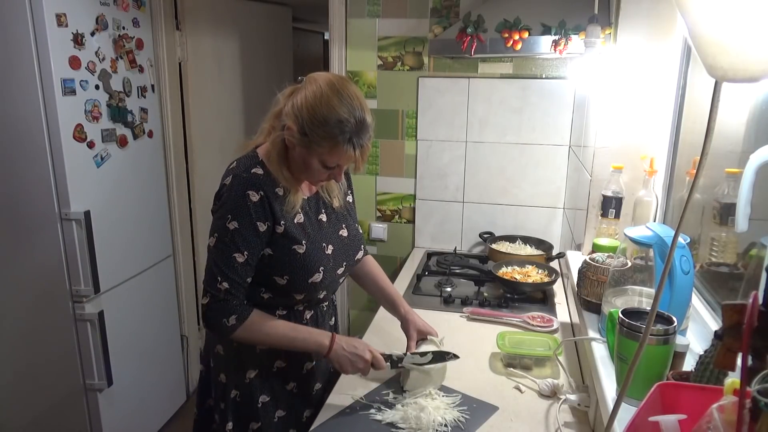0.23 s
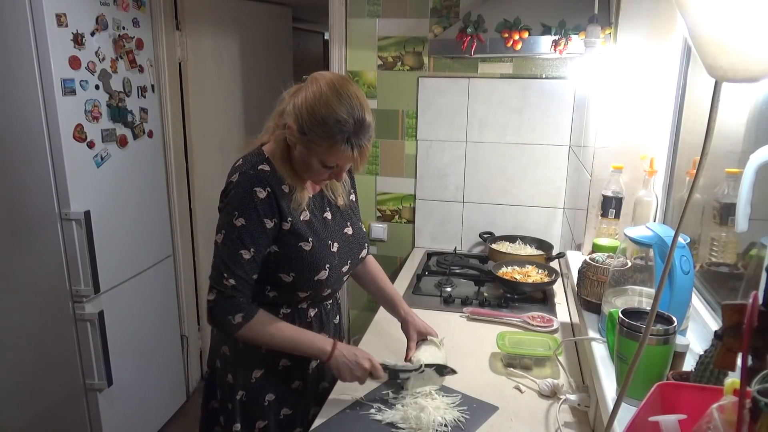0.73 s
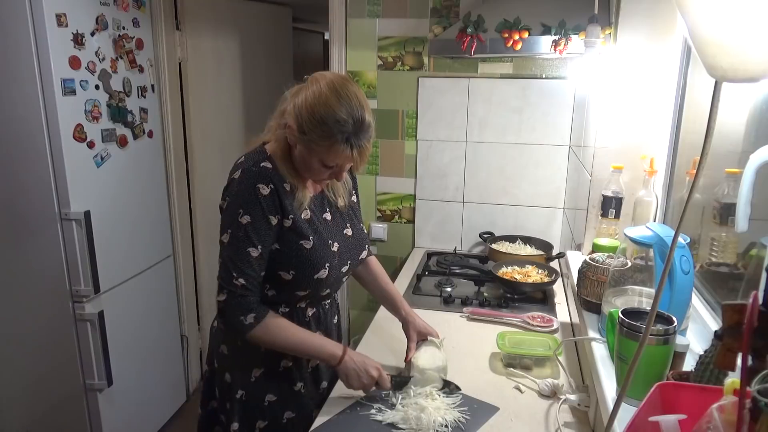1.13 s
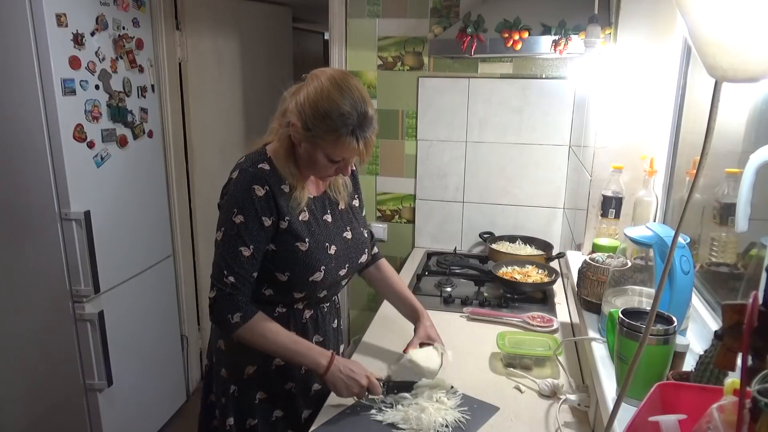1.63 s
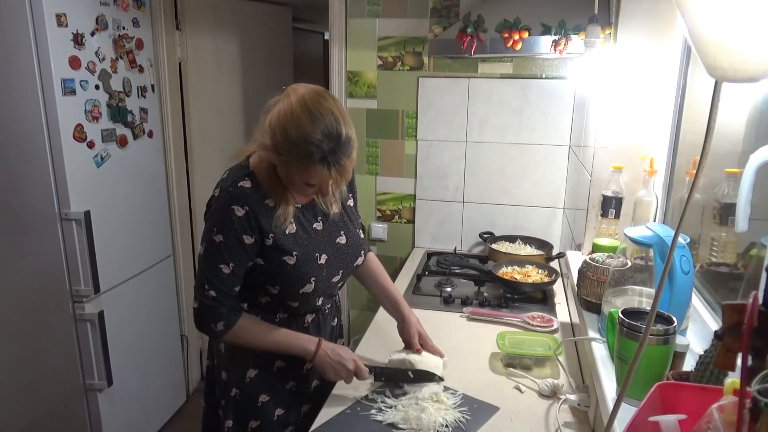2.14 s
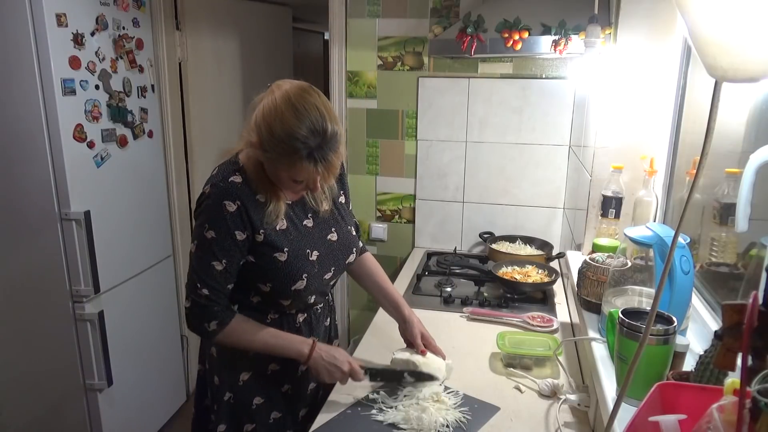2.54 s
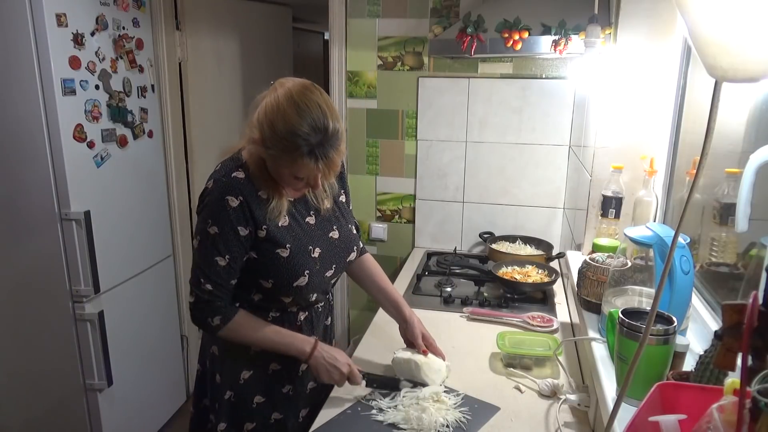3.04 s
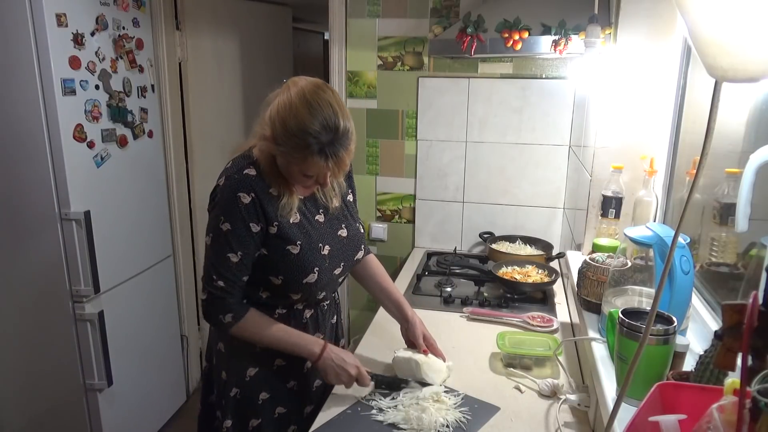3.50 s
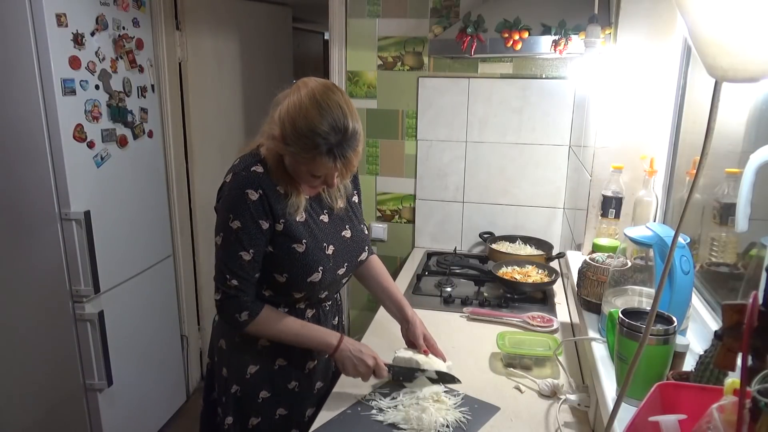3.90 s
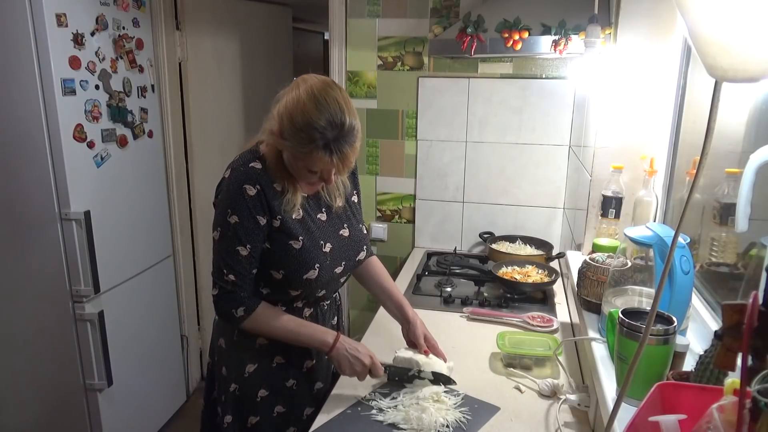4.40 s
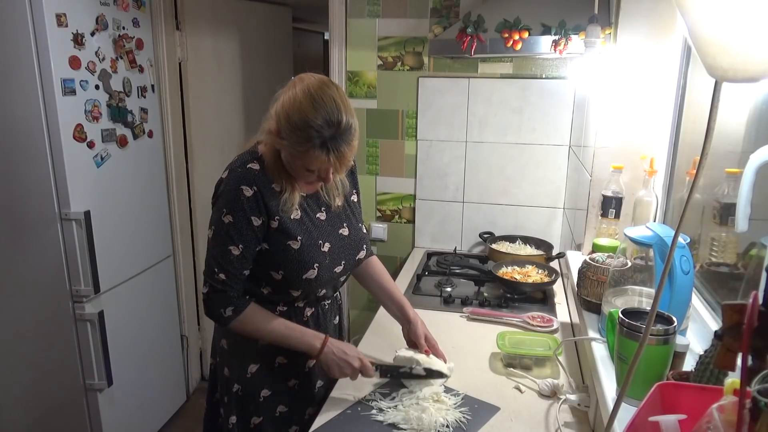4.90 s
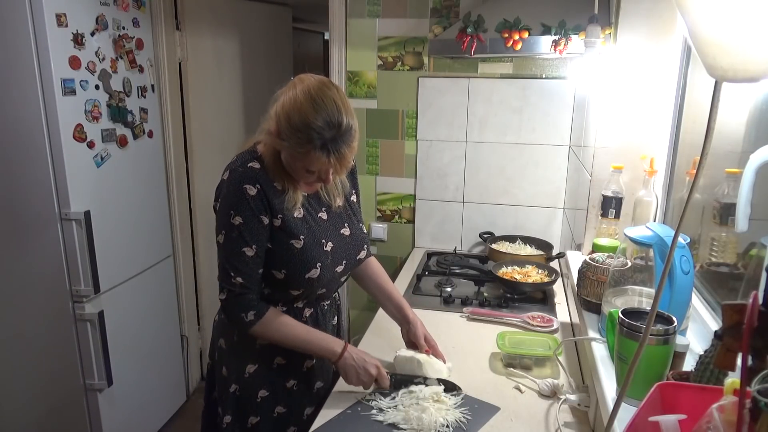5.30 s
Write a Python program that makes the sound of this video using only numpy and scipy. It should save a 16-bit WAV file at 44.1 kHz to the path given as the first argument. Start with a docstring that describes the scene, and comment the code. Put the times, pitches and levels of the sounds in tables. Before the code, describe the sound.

Crisp, uneven slicing and chopping of cabbage, with occasional knocks of blade on board, over a steady faint sizzle of frying.

```python
"""In a small kitchen, a large knife shreds a cabbage on a cutting board while two pans sizzle behind.
Steam bubbles burst in hot oil over the rush of gas burners. The edge fractures crisp cells in streams
and leaf ribs in single snaps; friction makes the board hum, light contacts tap it, and once the core
cracks. Full strokes end in an impact that excites the modes of board, counter and metalware.
The room reverberates, and a limiter holds the knocks down."""
import sys
import numpy as np
from scipy import signal
from scipy.io import wavfile
from scipy.ndimage import uniform_filter1d, minimum_filter1d

SR = 44100
rng = np.random.default_rng(int(sys.argv[2]) if len(sys.argv) > 2 else 0)


def to_wav(s):
    """Save 16-bit WAV."""
    ch = np.atleast_2d(s).T  # columns
    pcm = np.round(np.clip(ch, -1, 1) * 32767)  # PCM
    wavfile.write(sys.argv[1], SR, pcm.astype(np.int16))


N = 244754

# Fracture spectra of thin leaves and packed core. Each row: frequency in Hz, relative density in dB.
LEAF_SPECTRUM = [(35, -45), (95, -26), (130, -15.5), (160, -7), (230, -38), (2000, -15), (4000, -10),
                 (5400, -2), (6800, 0), (7800, 0), (9200, 6), (11000, -1), (13000, -7), (15500, -13.5)]
CORE_SPECTRUM = [(30, -28), (90, -17.5), (160, -13.5), (240, -20.5), (350, 0.5), (650, 2), (1200, 5),
                 (1900, 6.5), (3000, 5.5), (4600, 3.5), (6500, 0), (12000, -33.5)]


def amp(db):
    """Amplitude ratio: a factor of ten for every 20 dB."""
    return 10 ** (np.asarray(db) / 20)


def unit_rms(x):
    """Normalisation to a mean power of 1."""
    return x / np.sqrt(np.mean(x ** 2) + 1e-20)


def value_at(curve, hz):
    """Interpolation along a logarithmic frequency axis."""
    curve_hz, values = np.transpose(curve)
    return np.interp(np.log(hz + 1), np.log(curve_hz + 1), values)


def add(mix, start_s, sound):
    """Superposition: a stereo sound joins the mix at its start time."""
    part = mix[:, round(start_s * SR):][:, :sound.shape[1]]
    part += sound[:, :part.shape[1]]


def convolve(x, response):
    """Convolution with an impulse response, cut to the length of x."""
    return signal.fftconvolve(np.atleast_2d(x), np.atleast_2d(response), axes=1)[:, :x.shape[-1]]


def colour(x, spectrum, size=4096):
    """Minimum-phase filtering imposes a spectrum while clicks keep their sharp onset."""
    log_gain = np.log(amp(value_at(spectrum, abs(np.fft.fftfreq(size, 1 / SR)))))
    transfer = np.exp(np.conj(signal.hilbert(log_gain)))
    return convolve(x, np.fft.ifft(transfer).real)


def diffuse(pair):
    """Partial coherence: two independent signals, as mid and side, form a diffuse stereo field."""
    # Stereo width. Each row: frequency in Hz, side relative to mid in dB.
    width = [(100, -21), (330, -20), (650, -9), (1400, -8.5), (4000, -7), (8000, -8.5), (10500, -11.5),
             (13000, -41)]
    side = colour(pair[1], width)[0]
    return np.array([pair[0] + side, pair[0] - side])


def kitchen(wet_db, onset_s=.002):
    """Reverberation: direct sound, then dense, exponentially decaying reflections off counter and tiles."""
    # Reverberation time. Each row: frequency in Hz, time to fall 60 dB in seconds.
    room_t60 = [(100, 0.41), (400, 0.38), (1200, 0.34), (3000, 0.31), (8000, 0.24), (15000, 0.18)]
    size = SR // 2
    hz, t, noise_bands = signal.stft(rng.choice([-1., 1.], (2, size)), SR, nperseg=256)
    decay = amp(-60 * t / value_at(room_t60, hz)[:, None])
    tail = signal.istft(noise_bands * decay, SR)[1][:, :size]
    tail = diffuse(tail) * np.clip(np.arange(size) / SR / onset_s, 0, 1)
    response = amp(wet_db) * tail / np.linalg.norm(tail[0])
    response[:, 0] += 1  # the direct sound
    return response / np.linalg.norm(response[0])


def room_click(spectrum, wet_db):
    """Impulse response of a coloured source across the kitchen, with unit energy on the left."""
    response = colour(kitchen(wet_db), spectrum)
    return response / np.linalg.norm(response[0])


def clicks(per_s, spread_db):
    """A Poisson train of impulses of either sign: many small, a few large."""
    sizes = amp(spread_db * np.minimum(rng.exponential(1, N), 4))
    return unit_rms(sizes * rng.choice([-1, 1], N) * (rng.random(N) < per_s / SR))


def bursts(force, spectrum, wet_db, per_s, spread_db, spots=3):
    """Shot noise: tiny bursts scale with a force, at a few spots with separate paths through the room."""
    arrivals = [convolve(force * clicks(per_s / spots, spread_db), room_click(spectrum, wet_db))
                for _ in range(spots)]
    return sum(arrivals) / np.sqrt(spots)


def flicker(depth_db, per_s):
    """Random amplitude modulation: the level glides between normally distributed values."""
    t = np.arange(N) / SR
    return amp(depth_db * np.interp(t * per_s, np.arange(N), rng.standard_normal(N)))


def pans(sizzle_db=-39.5, burners_db=-58.5):
    """Steam bubbles bursting in hot oil make shot noise over the broadband rush of the gas burners."""
    # Spectra of bubbles and flames. Each row: frequency in Hz, relative density in dB.
    sizzle_spectrum = [(300, -55), (700, -32), (1000, -21), (1300, -13), (1850, -7), (2500, -7),
                       (3200, -6.5), (4000, -5.5), (5500, -4), (6600, -3.5), (7700, -0.5), (8700, 0),
                       (10500, -5.5), (13000, -12), (15800, -22.5)]
    burner_spectrum = [(20, -38), (50, -33), (90, -18.5), (160, -18), (250, -24.5), (360, -2), (480, -11.5),
                       (620, -5), (850, -2.5), (1100, -3.5), (1600, -24.5), (4000, -52)]
    boil = flicker(depth_db=-0.73, per_s=7)
    bubbles = bursts(boil, sizzle_spectrum, wet_db=4, per_s=5000, spread_db=4.5)
    flames = colour(diffuse(rng.standard_normal((2, N))), burner_spectrum)
    return amp(sizzle_db) * unit_rms(bubbles) + amp(burners_db) * unit_rms(flames)


def edge_force(swing_db=23.5, rounding=1.22, core_lag_s=0.0041, core_steepness=1.436):
    """Amplitude envelopes of fracture: how hard the edge works on the leaves and on the core."""
    # The blade is drawn through cabbage or loose shreds without a knock. Each row: deepest moment,
    # push time and release time in seconds, leaf level and core level in dB.
    slices = [ (0.42, 0.086, 0.11, -31.5, -42.5), (0.672, 0.098, .06, -30, -44),
              (0.918, 0.072, 0.087, -25.5, -33.5), (1.348, .02, 0.12, -36.5, -36.5),
              (3.994, 0.21, 0.06, -27, -31), (4.614, .1, 0.053, -23.5, -27.5),
              (5.16, 0.11, 0.08, -29, -29.5), ]
    # The blade speeds up and breaks out just above the board. Each row: moment of breaking through
    # and push time in seconds, leaf level and core level in dB.
    chops = [ (1.197, 0.078, -16, -16), (2.318, 0.14, -25, -23), (2.886, 0.14, -20.5, -18),
             (3.405, 0.13, -22, -18), (4.802, 0.074, -28.5, -28.5), (5.286, 0.072, -21, -15.5), ]
    t = np.arange(N) / SR
    on_leaves, on_core = np.zeros((2, N))
    for deepest, push, release, leaf_db, core_db in slices:
        for force, db, lag_s in (on_leaves, leaf_db, 0), (on_core, core_db, core_lag_s):
            since_deepest = t - lag_s - deepest
            away = np.maximum(-since_deepest / push, since_deepest / release)
            force += amp(db - swing_db * abs(away) ** rounding)  # rounding 1 is pointed, 2 a bell
    for through, push, leaf_db, core_db in chops:
        growth_db = np.where(t < through, swing_db * (t - through) / push, -np.inf)
        on_leaves += amp(leaf_db + growth_db)
        on_core += amp(core_db + core_steepness * growth_db)
    return on_leaves, on_core


def blade(x):
    """Resonance of the thin steel blade colours whatever excites it."""
    # Blade modes. Each row: frequency in Hz, bandwidth in Hz, gain in dB.
    blade_modes = [(5420, 160, -1), (7860, 860, -2.5), (8700, 260, -21), (11260, 550, -8.5)]
    return x + sum(amp(db) * signal.lfilter(*signal.iirpeak(hz, hz / width_hz, SR), x)
                   for hz, width_hz, db in blade_modes)


def cutting(crackle_db=-1, crunch_db=2.0):
    """Brittle fracture: the edge bursts cells, in clumps as it passes from leaf to leaf."""
    on_leaves, on_core = edge_force()
    clumps = unit_rms(flicker(depth_db=2.0, per_s=200))
    crackle = bursts(on_leaves * clumps, LEAF_SPECTRUM, wet_db=0, per_s=3000, spread_db=2.5, spots=2)
    crunch = bursts(on_core * clumps, CORE_SPECTRUM, wet_db=3.0, per_s=3000, spread_db=3.0, spots=2)
    return blade(amp(crackle_db) * crackle + amp(crunch_db) * crunch)


def drags(hum_hz=645, width_hz=100, taper=0.61):
    """Friction under the moving blade drives the board's strongest resonance into a soft hum."""
    # Drags over the board. Each row: start in seconds, length in seconds, level in dB.
    strokes = [(0.386, 0.083, -52.5), (1.33, .18, -47.5), (2.025, .11, -57.5), (2.181, 0.058, -54.5),
               (2.457, .095, -45.5), (2.773, .09, -45), (3.001, 0.095, -44.5), (4.361, 0.051, -58)]
    out = np.zeros((2, N))
    resonance = signal.butter(2, [hum_hz - width_hz / 2, hum_hz + width_hz / 2], "band", fs=SR)
    for start_s, length_s, db in strokes:
        size = round(length_s * SR)
        friction = diffuse(rng.standard_normal((2, 2 * size)))
        hum = signal.lfilter(*resonance, friction)[:, size:]  # steady state only
        add(out, start_s, amp(db) * unit_rms(hum * signal.windows.tukey(size, taper)))
    return out


def taps_and_core_crack(band_ratio=1.265):
    """Each impulse excites one heavily damped resonance, heard mostly as reverberation."""
    # Light taps on the board, and one louder mid-pitched crack at 5.256 s as the blade breaks into
    # the core. Each row: start in seconds, level in dB, pitch in Hz.
    impulses = [(0.528, -40, 1510), (0.872, -30.5, 1930), (1.076, -38, 1720), (1.733, -39, 1800),
                (1.978, -31.5, 1720), (1.986, -43, 1680), (2.19, -34.5, 1600), (2.763, -35.5, 1010),
                (3.331, -25, 1300), (5.082, -36, 1980), (5.256, -15.5, 1900)]
    out = np.zeros((2, N))
    for start_s, db, hz in impulses:
        resonance = signal.butter(2, [hz / band_ratio, hz * band_ratio], "band", fs=SR)
        sound = signal.lfilter(*resonance, kitchen(wet_db=14))
        add(out, start_s, amp(db) * sound / abs(sound).max())
    return out


def snaps(crunch_db=-8, cutoff_hz=14000, tear_db=-12, tear_s=0.00057):
    """Sudden fracture: a leaf rib breaks with one impulse and a very short, noisy tear."""
    # Breaking ribs. Each row: start in seconds, level in dB.
    ribs = [(0.592, -23), (0.643, -38), (0.905, -13), (0.927, -22), (1.1329, -9.5), (1.266, -13),
            (1.363, -33), (2.124, -23), (2.656, -25), (2.811, -9), (2.8665, -27), (3.196, -25),
            (3.377, -25), (3.69, -25), (4.5201, -14), (4.563, -20), (4.597, -23), (4.6, -19),
            (4.6928, -16.5), (4.782, -18.5), (4.798, -26), (4.842, -7.5), (5.2565, -14), (5.347, -16)]
    out = np.zeros((2, N))
    t = np.arange(SR // 100) / SR
    low_pass = signal.butter(2, cutoff_hz, fs=SR)
    for start_s, db in ribs:
        crack = (t == 0) + amp(tear_db) * rng.standard_normal(len(t)) * np.exp(-t / tear_s)
        response = room_click(LEAF_SPECTRUM, wet_db=2.0)
        response += amp(crunch_db) * room_click(CORE_SPECTRUM, wet_db=15.0)
        snap = blade(signal.lfilter(*low_pass, convolve(response, crack)))
        add(out, start_s, amp(db) * snap / abs(snap).max())
    return out


def board_response(metal_db, board_t60_s=0.22, wash_db=-5, direct_db=-12, spot_db=2.4, rise_s=0.0013):
    """Modal superposition: board, counter, room and metalware ring as a sum of damped sinusoids."""
    # Modes of board, counter and room. Each row: frequency in Hz, relative level in dB.
    board_modes = [(329, -20), (376, -16), (432, -12), (456, -11), (496, -13), (543, -14), (602, -9),
                   (637, -4), (655, 0), (681, -4), (746, -9), (833, -8), (858, -9), (926, -7), (969, -13),
                   (1011, -5), (1033, -6), (1060, -2), (1089, -14), (1302, -6), (1331, -6), (1377, -4),
                   (1422, -4), (1461, -8), (1506, -12), (1567, -2), (1699, -11), (1781, -6), (2081, -11),
                   (2196, -11)]
    # Metalware on the counter. Each row: frequency in Hz, relative level in dB, 60 dB decay in seconds.
    metal_modes = [(566, -20.5, 0.97), (884, -28, 0.95), (1112, -29.5, 0.54)]
    # Dense, weaker resonances between the modes. Each row: frequency in Hz, relative density in dB.
    wash_spectrum = [(30, -34), (100, -31.5), (160, -15), (260, -22), (360, -3.5), (650, 0.5), (1050, 6),
                     (1200, 1), (1450, 7), (1850, 2), (2300, -6.5), (3000, -9), (5000, -27), (10000, -37)]
    t = np.arange(SR // 2) / SR
    modes = [(hz, db, board_t60_s) for hz, db in board_modes]
    modes += [(hz, db + metal_db, t60) for hz, db, t60 in metal_modes]
    ring = np.zeros((2, len(t)))
    for k, (hz, db, t60) in enumerate(modes):
        # Short waves reach left and right out of step.
        lead_radians = 0.4 * min(hz / 600, 1) ** 2 * rng.choice([-1, 1])
        phase = np.pi * k + np.array([[lead_radians], [-lead_radians]])  # neighbours swing oppositely
        weight = amp(db + spot_db * rng.standard_normal())  # varies with the spot struck
        ring += weight * np.exp(-np.log(1000) * t / t60) * np.sin(2 * np.pi * hz * t + phase)
    ring *= (1 - np.exp(-t / rise_s)) ** 2
    direct = colour(1. * (t == 0), wash_spectrum)
    response = ring / np.linalg.norm(ring[0]) + amp(wash_db) * room_click(wash_spectrum, wet_db=12)
    response += amp(direct_db) * direct / np.linalg.norm(direct)
    return response / np.sqrt(np.sum(response ** 2) / (2 * 0.02 * SR))  # energy of 20 ms at rms 1


def knocks(contact_q=0.95):
    """Elastic impact of blade on board: cabbage cushions and dulls it; a resting blade damps the ring."""
    # Each row: start in seconds, level in dB, contact cut-off (hardness) in Hz,
    # added damping in dB per second, metalware gain in dB.
    blows = [ (1.2005, -7.5, 1460, 6, -2.5), (2.3228, -4.5, 1850, 10, -1.5), (2.8908, -8.5, 1100, 9, -9),
             (3.409, -5, 1980, 24, -4.5), (3.784, -43.5, 1210, 48, 4), (4.727, -36.5, 1200, 122, -3),
             (4.8036, -20.5, 1060, 98, 6), (5.2889, -3.5, 2520, 20, -8), ]
    out = np.zeros((2, N))
    for start_s, db, contact_hz, damping_db_per_s, metal_db in blows:
        # The contact is a spring: it passes what lies below its own frequency, with a slight peak.
        omega = 2 * np.pi * contact_hz
        contact = signal.bilinear([omega ** 2], [1, omega / contact_q, omega ** 2], SR)
        knock = signal.lfilter(*contact, board_response(metal_db))
        t = np.arange(knock.shape[1]) / SR
        add(out, start_s, amp(db - damping_db_per_s * t) * knock)
    return out


def scene(left_minus_right_db=-0.5):
    """Superposition of knife and pans, with a slight level difference between the channels."""
    knife = cutting() + snaps() + knocks() + drags() + taps_and_core_crack()
    balance = amp([[left_minus_right_db / 2], [-left_minus_right_db / 2]])
    return (knife + pans()) * balance


def record(dry, ceiling_db=-5.0, release_db_per_s=330, ahead_samples=110, cutoff_hz=15850):
    """Look-ahead limiting: the gain dips just before loud peaks and recovers fast; a low-pass follows."""
    over_db = np.maximum(20 * np.log10(abs(dry).max(0) + 1e-9) - ceiling_db, 0)
    ahead_db = -minimum_filter1d(-over_db, 2 * ahead_samples)
    release_db = np.arange(N) * release_db_per_s / SR
    held_db = np.maximum.accumulate(ahead_db + release_db) - release_db
    duck_db = uniform_filter1d(held_db, ahead_samples // 2)
    low_pass = signal.firwin(511, cutoff_hz, window=("kaiser", 9), fs=SR)
    return signal.oaconvolve(dry * amp(-duck_db), low_pass[None], "same")


dry = scene()
out = record(dry)
to_wav(out)
```